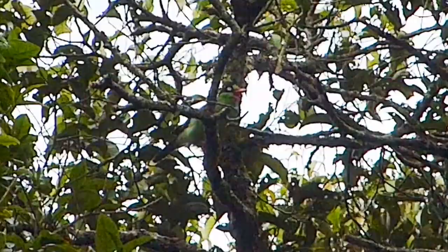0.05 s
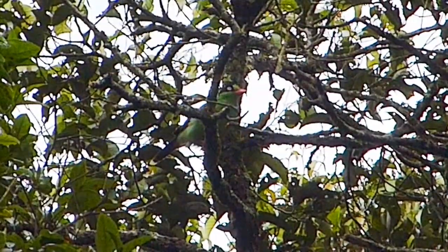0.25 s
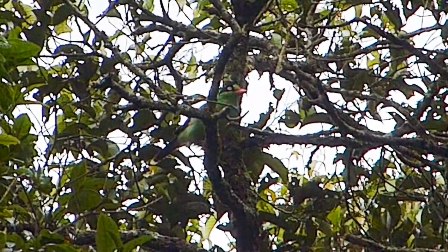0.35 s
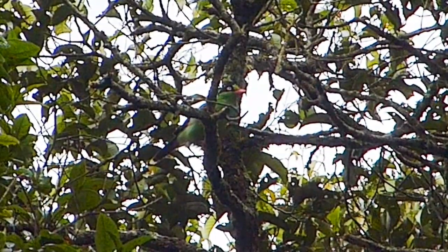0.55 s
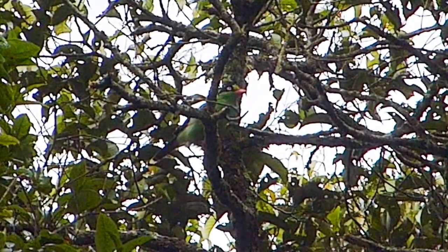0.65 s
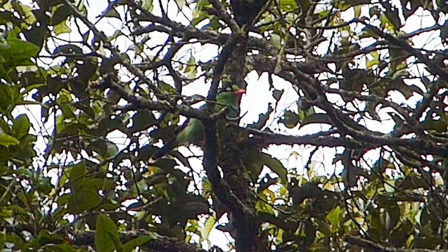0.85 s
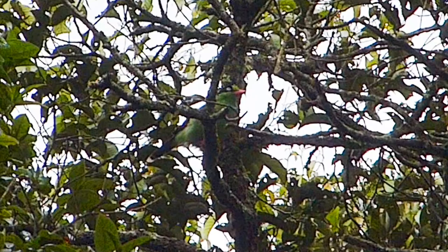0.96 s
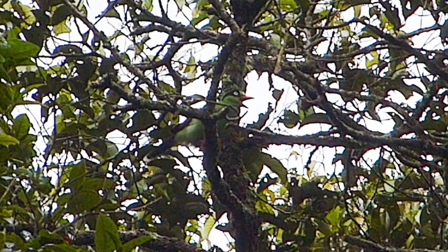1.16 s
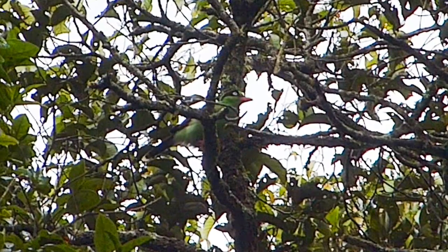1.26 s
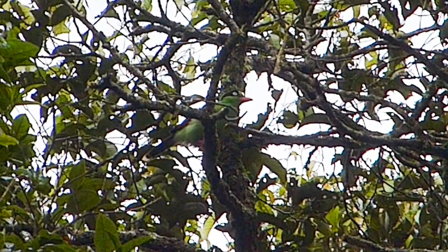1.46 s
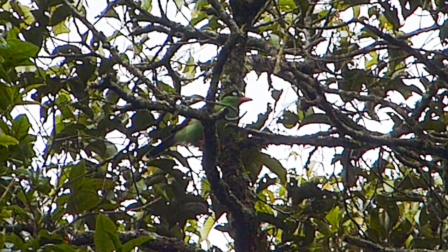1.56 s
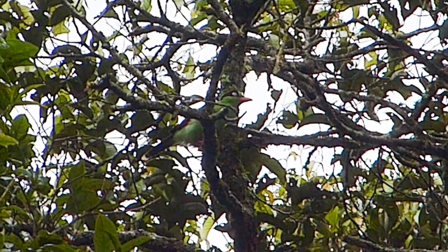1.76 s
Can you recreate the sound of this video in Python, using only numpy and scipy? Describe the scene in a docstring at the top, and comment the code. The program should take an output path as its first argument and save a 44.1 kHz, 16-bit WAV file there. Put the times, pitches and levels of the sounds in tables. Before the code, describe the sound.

A bird gives two loud, clear rising whistles that echo through a quiet forest.

```python
"""Two whistles in a forest

A small bird in a tree gives two loud rising whistles, nearly pure tones that trunks and leaves
scatter into a long tail. Far birds add faint falling notes and a run of pips. A few dull taps
and bright ticks sound close by, over the hush of the wood and a low, swelling rush."""
import sys
import numpy as np
from scipy import signal
from scipy.fft import rfft, irfft, next_fast_len
from scipy.io import wavfile
from scipy.ndimage import map_coordinates

SR = 44100
rng = np.random.default_rng(int(sys.argv[2]) if len(sys.argv) > 2 else 0)


def waveform_to_disk(signal):
    """Save audio, clipped to [-1, 1], as 16-bit WAV at the path in sys.argv[1]."""
    frames = np.transpose(np.atleast_2d(signal))
    scaled = np.clip(frames, -1, 1) * 32767
    samples = np.round(scaled).astype(np.int16)
    wavfile.write(sys.argv[1], SR, samples)


N = 79380


def near_bird():
    """Two whistles, each heard directly, off the branches and through the forest."""
    # a quick rise, a plateau, a last flick up: time_s, pitch_hz
    first_pitch = [(.177, 2150), (.183, 2450), (.19, 2790), (.213, 3230), (.222, 3610), (.237, 4030),
                   (.25, 4140), (.269, 4195), (.283, 4310), (.298, 4560), (.319, 4890), (.327, 5270),
                   (.337, 5330)]
    second_pitch = [(1.279, 2150), (1.285, 2430), (1.292, 2750), (1.318, 3350), (1.332, 3850),
                    (1.345, 4050), (1.37, 4180), (1.392, 4300), (1.407, 4570), (1.422, 4830), (1.431, 5190),
                    (1.438, 5290)]
    # the swell of each whistle: time_s, level_db
    first_level = [(.177, -40.5), (0.185, -32.5), (0.194, -27), (0.211, -25.5), (0.23, -22), (0.242, -16.5),
                   (.27, -21.5), (.29, -19.5), (0.31, -20.5), (0.336, -27.5)]
    second_level = [(1.279, -48), (1.285, -34.5), (1.3, -27.5), (1.333, -23.5), (1.343, -12.5),
                    (1.362, -19.5), (1.388, -25), (1.41, -17.5), (1.425, -21.5), (1.438, -25.5)]
    calls = [whistle(first_pitch, first_level), whistle(second_pitch, second_level)]
    return sum(call + branches(call) + panned(forest(call), left_db=-.8) for call in calls)


def whistle(pitch, level):
    """A nearly pure, fluttering tone whose weak overtones are coloured by the beak."""
    # overtones ahead of the beak: multiple, level_db
    partials = [(2, -22.5), (3, -38), (4, -49)]
    # the beak's colour: frequency_hz, gain_db
    beak = [(5000, -16), (6000, -12.5), (7600, -5.5), (8500, 1.5), (9500, 2.5), (10600, -8), (12600, 4.5),
            (14200, -4), (15200, -16.5)]
    edge_s, full_voice_db, flutter_db = .003, -16.5, 1.5
    t = clock()
    times, hz = np.transpose(pitch)
    pitch_hz = np.interp(t, times, hz) * (1 + .004 * wobble(per_s=260))
    phase = 2 * np.pi * np.cumsum(pitch_hz) / SR
    level_db = contour(level)
    gate = np.clip(np.minimum(t - times[0], times[-1] - t) / edge_s, 0, 1)
    overtones = sum(amp(db + along(beak, k * pitch_hz)) * np.sin(k * phase) for k, db in partials)
    richness = amp(.51 * (full_voice_db - level_db))  # the softer the voice, the richer the tone
    tone = np.sqrt(2) * (np.sin(phase) + richness * overtones)
    return gate * amp(level_db + flutter_db * wobble(per_s=140)) * tone


def branches(x, count=8, spread_s=.02):
    """A few weak, early reflections from the branches round the perch."""
    delays = rng.uniform(0, spread_s, count)
    echoes = filtered(x, lambda hz: np.exp(-2j * np.pi * hz * delays[:, None]).sum(0))
    return amp(-7) / np.sqrt(count) * echoes


def forest(x):
    """Scattered sound: a quick, dense decay from the foliage and a slow one from far trees."""
    # the tail's colour: frequency_hz, gain_db
    colour = [(1500, -4), (3000, 0.5), (4100, 1), (4900, 1.5), (9000, -2), (14000, 0)]
    t = clock()
    build = 1 - np.exp(-t / .0041)
    decay = lambda t60_s: unit(amp(-60 * t / t60_s) * build) / np.sqrt(N)
    foliage = amp(-.5) * decay(t60_s=.52)
    far_trees = amp(-9) * decay(t60_s=1.4)
    tail = np.hypot(foliage, far_trees) * noise(colour, likeness=[(1000, .77)])
    return signal.fftconvolve(x[None], tail, axes=1)[:, :N]


def taps():
    """Small, dull contacts close by: a few cycles that sag in pitch."""
    # contacts: start_s, peak_db, pitch_hz, left_over_right_db
    contacts = [(0.3787, -25.5, 1556, 13), (0.4143, -32.5, 1300, 7), (0.6353, -37.5, 1140, 17.5),
                (0.9017, -28.5, 1170, 8), (.930, -37, 1630, -3)]
    rise_s, t60_s, sag_s = .0004, .005, .012
    out = np.zeros((2, N))
    for start, db, hz, left_db in contacts:
        t = np.maximum(clock() - start, 0)
        phase = 2 * np.pi * hz * sag_s * np.log1p(t / sag_s)
        envelope = (1 - np.exp(-t / rise_s)) ** 2 * amp(-60 * t / t60_s)
        ring = envelope * np.sin(phase)
        out += panned(amp(db) * ring / np.abs(ring).max(), left_db)
    return out


def ticks():
    """Tiny bright cracks of noise, as of twigs or drips on leaves."""
    # bursts ahead of their colouring: start_s, level_db, t60_s, left_over_right_db
    bursts = [(.634, -40, 0.017, 13.5), (0.723, -41.5, 0.0052, 2), (0.774, -40, 0.0047, -7),
              (.851, -39.5, .006, 5), (.863, -31.5, 0.0046, 0), (.9015, -40.5, 0.0066, 9.5),
              (.931, -47, 0.037, 1)]
    # their bright colour: frequency_hz, gain_db
    colour = [(500, -13), (3000, -6), (7000, 4), (10000, -1), (12500, -8), (15500, -24)]
    white = noise([(1000, 0)], likeness=[(1000, .8)])
    out = np.zeros((2, N))
    for start, db, t60_s, left_db in bursts:
        t = clock() - start
        envelope = (t >= 0) * amp(db - 60 * np.abs(t) / t60_s)
        out += panned(envelope * white, left_db)
    return filtered(out, lambda hz: amp(along(colour, hz)))


def far_birds():
    """Faint, mostly falling notes and a quick run of pips, blurred by the forest."""
    # notes as sung: start_s, length_s, from_hz, to_hz, level_db
    glides = [(0.661, 0.094, 1955, 1898, -54), (0.727, 0.13, 1907, 1751, -48.5),
              (1.216, 0.087, 2033, 1916, -48), (1.298, 0.09, 1794, 1720, -48),
              (1.412, 0.045, 1696, 1647, -40), (1.47, 0.24, 1683, 1717, -51.5),
              (1.496, 0.15, 1520, 1453, -45), (1.661, 0.044, 1303, 1257, -41)]
    # pips as sung: start_s, pitch_hz, level_db
    pip_run = [(1.375, 1121, -42), (1.439, 1070, -38), (1.499, 1105, -34), (1.564, 1154, -34)]
    pip_s, pip_fall = .019, .031
    notes = sum(far_note(*glide) for glide in glides)
    pips = sum(far_note(start, pip_s, hz, hz * (1 - pip_fall), db) for start, hz, db in pip_run)
    song = notes + pips
    return amp(-4) * song + forest(song)


def far_note(start_s, length_s, from_hz, to_hz, db, fade_s=.015):
    """One wavering sine glide that fades in and out."""
    t = clock() - start_s
    pitch_hz = np.interp(t, [0, length_s], [from_hz, to_hz]) * (1 + .026 * wobble(per_s=120))
    gate = np.clip(np.minimum(t, length_s - t) / fade_s, 0, 1)
    return amp(db) * gate * np.sin(2 * np.pi * np.cumsum(pitch_hz) / SR)


def hush():
    """The soft, slightly restless noise bed of the wood."""
    # the bed's colour: frequency_hz, gain_db
    colour = [(25, -15), (60, -18), (78, -0.5), (95, -7.5), (170, -5.5), (280, -7.5), (450, -1), (850, 3),
              (1500, -1.5), (2400, -9), (3800, -12.5), (4700, -6), (5600, -14.5), (7500, -14.5),
              (10000, -18.5), (13000, -28), (15500, -38.5)]
    # how alike the two ears are: frequency_hz, correlation
    likeness = [(30, 0.44), (80, .9), (150, 0.68), (400, 0.12), (1200, 0.43), (4000, 0.62), (12000, 0.44)]
    # slow drift ahead of the lift: time_s, level_db
    drift = [(.13, -49), (0.201, -48.5), (.3, -50.5), (.55, -50), (.72, -52), (.88, -50), (.96, -48),
             (1.15, -51.5), (1.449, -49.5), (1.651, -52.5), (1.8, -49)]
    lift_db = 2
    level_db = contour(drift) + lift_db + .5 * wobble(per_s=14.06)
    return amp(level_db) * noise(colour, likeness)


def low_rush():
    """A dull rush, left of centre, that swells and sinks under the hush."""
    # its swells: time_s, level_db
    swell = [(.13, -51), (0.229, -56), (.32, -58), (.88, -63.5), (.96, -52.5), (1.12, -55.5), (1.24, -54),
             (1.379, -55.5), (1.48, -65), (1.68, -61.5), (1.8, -60)]
    # its dark colour: frequency_hz, gain_db
    colour = [(100, -51), (200, -7), (270, 2), (400, -0.5), (600, -5), (1200, -30.5)]
    rush = amp(contour(swell)) * noise(colour, likeness=[(300, .64)])
    return panned(rush, left_db=5)


def amp(db):
    """Decibels to gain."""
    return 10 ** (np.asarray(db) / 20)


def unit(x):
    """Scale to rms 1."""
    return x / np.sqrt(np.mean(x ** 2) + 1e-20)


def clock():
    """The time of each sample in seconds."""
    return np.arange(N) / SR


def contour(points):
    """An automation curve through (time_s, value) points."""
    return np.interp(clock(), *np.transpose(points))


def along(points, hz):
    """Read a curve of (frequency_hz, value) points on a log frequency axis."""
    frequencies, values = np.transpose(points)
    return np.interp(np.log(hz + 1), np.log(frequencies + 1), values)


def wobble(per_s):
    """A smooth random curve with per_s knots a second."""
    return map_coordinates(rng.standard_normal(N // 20), [clock() * per_s], mode="wrap")


def filtered(x, response):
    """Shape x with a gain given as a function of frequency."""
    size = next_fast_len(N + SR // 2)
    hz = np.fft.rfftfreq(size, 1 / SR)
    return irfft(rfft(x, size) * response(hz), size)[..., :N]


def noise(colour, likeness):
    """Coloured stereo noise of rms 1 with a given correlation between the ears."""
    def mid_side_gains(hz):
        width = np.arccos(np.clip(along(likeness, hz), -1, 1)) / 2
        return amp(along(colour, hz)) * [np.cos(width), np.sin(width)]
    mid, side = filtered(rng.standard_normal((2, N)), mid_side_gains)
    return unit(np.array([mid + side, mid - side]))


def panned(x, left_db):
    """Place a sound by how much louder it is left than right."""
    return x * amp([[left_db / 2], [-left_db / 2]])


def scene():
    """The birds, the small close sounds with their forest echo, and the background."""
    close = taps() + ticks()
    birds = near_bird() + far_birds()
    close_echo = amp(-8) * forest(close.mean(0))
    return birds + close + close_echo + hush() + low_rush()


def record(dry):
    """The sound cuts in after a moment of silence, with the very top of the treble removed."""
    start_s, top_hz = .11, 15720
    return filtered(dry * (clock() > start_s), lambda hz: hz < top_hz)


dry = scene()
out = record(dry)
waveform_to_disk(out)
```